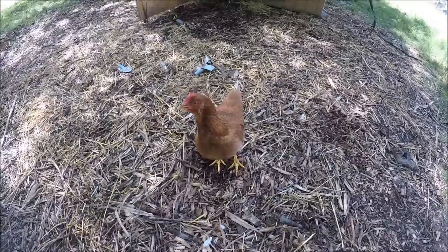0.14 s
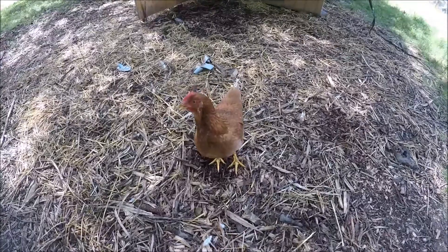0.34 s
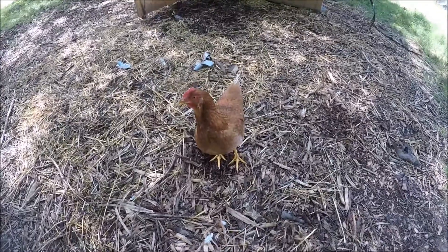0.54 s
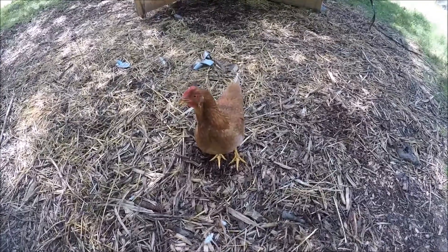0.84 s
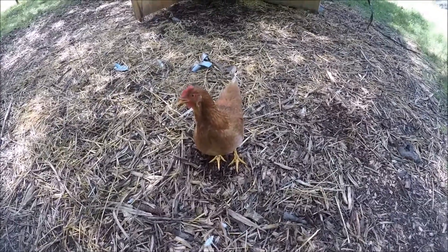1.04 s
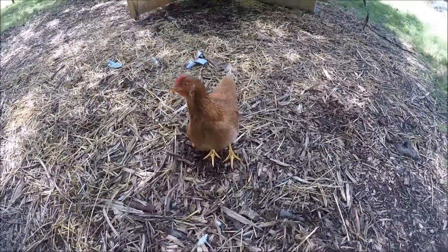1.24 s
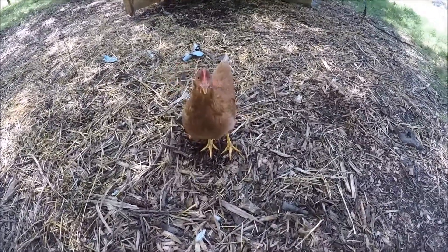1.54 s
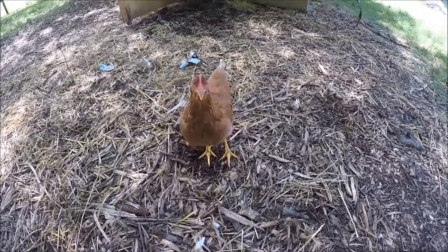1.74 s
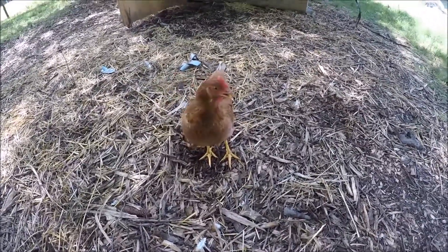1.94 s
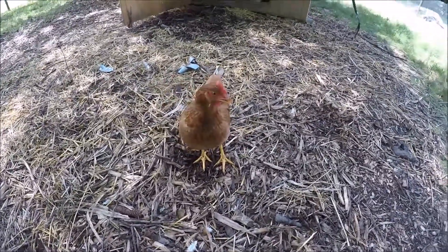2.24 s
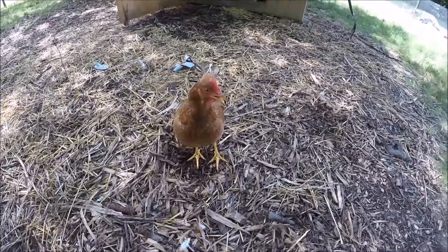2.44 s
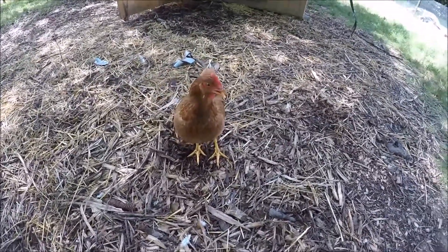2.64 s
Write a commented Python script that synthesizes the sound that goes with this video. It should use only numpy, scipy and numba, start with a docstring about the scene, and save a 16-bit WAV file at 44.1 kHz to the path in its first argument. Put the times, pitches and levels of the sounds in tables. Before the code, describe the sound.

Four held, nasal hen calls, each starting with a low catch, some rasping and cracking upward, close and nearly dry in stereo; faint outdoor hiss and low rumble, with muffled handling rubs and a single thud.

```python
"""In a straw-covered yard, a young hen close by gives four drawn-out whining calls.
Each opens with a low catch and settles on a held note; rasp and upward cracks roughen some of them.
The voice is source and filter: airy pulses of the syrinx ring the resonances of throat and beak.
Filtered noise makes the outdoor hiss and rumble. A hand rubbing the camera's case is filtered noise,
and its one knock is a sum of decaying modes."""
import sys
import numpy as np
from scipy import signal
from scipy.fft import rfft, irfft, next_fast_len
from scipy.io import wavfile
from scipy.ndimage import uniform_filter1d
from numba import njit

SR = 44100
rng = np.random.default_rng(int(sys.argv[2]) if len(sys.argv) > 2 else 0)


def bounce(signal):
    """Save signal as a 16-bit WAV file at the path given by the first command-line argument."""
    frames = np.transpose(np.atleast_2d(signal))
    limited = np.clip(frames, -1, 1)
    pcm = np.round(limited * 32767).astype(np.int16)
    wavfile.write(sys.argv[1], SR, pcm)


N = 123479
T = np.arange(N) / SR  # time [s]


def undb(db):
    """Amplitude ratio: a gain is ten to the power of its level in dB over 20."""
    return 10 ** (np.asarray(db) / 20)


def curve(rows, axis=1):
    """Linear interpolation: one column of a table is joined by straight lines in time."""
    rows = np.array(rows)
    return np.interp(T, rows[:, 0], rows[:, axis])


def over_hz(points, f):
    """Logarithmic frequency scale: values are joined by straight lines along it."""
    points = np.array(points)
    return np.interp(np.log(f + 1), np.log(points[:, 0]), points[:, 1])


def unit(x):
    """Normalization: scale to an rms value of 1."""
    return x / np.sqrt(np.mean(x ** 2))


def colour(x, points):
    """Minimum-phase filtering: folding the cepstrum makes a (Hz, dB) response causal."""
    size = 4096
    f = np.arange(size // 2 + 1) * SR / size
    cepstrum = irfft(np.log(undb(over_hz(points, f))))
    cepstrum[1:size // 2] *= 2
    cepstrum[size // 2 + 1:] = 0
    impulse_response = irfft(np.exp(rfft(cepstrum)))
    return signal.fftconvolve(x, impulse_response)[:N]


def cut(x, hz, kind):
    """Zero-phase filtering: a Butterworth low-pass or high-pass runs forward and backward."""
    sections = signal.butter(6, hz, kind, fs=SR, output="sos")
    return signal.sosfiltfilt(sections, x)


@njit
def resonance(x, hz, width):
    """Simple resonator: a two-integrator band-pass with a moving centre, where its gain is 1."""
    y, band, low = np.empty(len(x)), 0., 0.
    for i in range(len(x)):
        g = np.tan(np.pi * hz[i] / SR)
        damping = width / hz[i]
        v = (band + g * (x[i] - low)) / (1 + g * (g + damping))
        band = 2 * v - band
        low = low + 2 * g * v
        y[i] = damping * v
    return y


def fixed_resonance(x, hz, width):
    """Simple resonator whose centre frequency stays constant."""
    return resonance(x, np.full(N, float(hz)), float(width))


def wide_noise(points, likeness):
    """Interchannel correlation: a shared part and an opposed part set how alike the sides are."""
    mid, side = (unit(colour(rng.standard_normal(N), points)) for _ in range(2))
    c = np.clip(likeness, -.9, .95)
    return mid + np.sqrt((1 - c) / (1 + c)) * side * np.array([[1], [-1]])


# spectrum of the outdoor air: (frequency [Hz], relative density [dB])
AIR_SPECTRUM = [(350, -38.5), (600, -7.5), (1160, -2), (1680, -3.5), (2700, -9.5), (6100, -6.5),
                (14000, -30)]
# level of the part of the hiss shared by both sides: (time [s], level [dB])
HISS_LEVEL = [(0, -52), (.35, -47.5), (.6, -52.5), (1.25, -53), (1.7, -49), (2.8, -51.5)]
# spectrum of the low rumble: (frequency [Hz], relative density [dB])
RUMBLE_SPECTRUM = [(30, -23), (112, -27), (150, 3), (280, -1.5), (400, -7), (700, -12), (1200, -59)]
RUMBLE_DB = -50  # of the part shared by both sides


def outdoors():
    """Random noise: a soft wide hiss lies over a low rumble, each with a continuous spectrum."""
    hiss = wide_noise(AIR_SPECTRUM, likeness=.1) * undb(curve(HISS_LEVEL))
    rumble = wide_noise(RUMBLE_SPECTRUM, likeness=.45) * undb(RUMBLE_DB)
    return hiss + rumble


# upward cracks of the voice: (time [s], strength [0-1])
VOICE_BREAKS = [(.128, .6), (.165, 1), (.752, .8), (.771, .85), (.796, .5), (.857, .9), (.871, .8),
                (.886, .9), (.905, .95), (.939, .9), (.949, .9), (.963, .7), (1.003, .85), (2.246, .5),
                (2.29, .45), (2.36, .95), (2.406, 1), (2.444, 1), (2.456, .8), (2.468, .9), (2.65, .85)]
BREAK_S = .0105  # from the peak to 1/e


def breaking():
    """Register break: how far the voice is broken, as the tallest of overlapping Gaussian bumps."""
    bumps = [strength * np.exp(-((T - at) / BREAK_S) ** 2) for at, strength in VOICE_BREAKS]
    return np.max(bumps, axis=0)


FLUTTER_PER_S = 55


def waver():
    """Random modulation: normal chance values joined by lines vary quickly yet continuously."""
    knots = rng.standard_normal(int(N / SR * FLUTTER_PER_S) + 2)
    return np.interp(T * FLUTTER_PER_S, np.arange(len(knots)), knots)


WOBBLE, RASP_WOBBLE = .003, .07  # pitch waver as a share: always, and added by full rasp
JITTER, SLIP, SHIMMER_DB = .075, .1, 2.5  # scatter of timing [cycles], its drift [cycles], and size
ALTERNATE_LAG, ALTERNATE_DB = .078, 5  # every second pulse late [cycles] and weak, the others opposite
# the two sides of the syrinx beat: rate and its scatter [beats per cycle], lag [cycles], depth
BEAT_PER_CYCLE, BEAT_DRIFT, BEAT_LAG, BEAT_DB = .26, .11, .16, 5
SOFT_AIR_DB = 6.5  # extra air in the softest call
# spectrum of the air in each puff: (frequency [Hz], gain [dB])
PUFF_AIR_SPECTRUM = [(300, -31), (700, -25), (1350, -12), (3600, -11), (9000, -20)]


def syrinx(hz, rasp, alternation, soft):
    """Pulsed source: one sharp, airy puff a cycle; rasp scatters the puffs, alternation pairs them."""
    cycles = np.cumsum(hz * (1 + (WOBBLE + RASP_WOBBLE * rasp) * waver())) / SR
    alternation = alternation * (1 + .5 * waver())  # the pairing comes and goes
    k = np.arange(int(cycles[-1]))
    chance = rng.standard_normal((N // 64, 4))[:len(k)].T
    rough, paired = (np.interp(k, cycles, np.clip(v, 0, 1)) for v in (rasp, alternation))
    paired = paired * (-1.) ** k
    beat = rough * np.sin(2 * np.pi * np.cumsum(BEAT_PER_CYCLE + BEAT_DRIFT * chance[3]))

    late = JITTER * rough * chance[0] + SLIP * np.cumsum(rough * chance[1])
    late = late + ALTERNATE_LAG * paired + BEAT_LAG * beat
    at = np.interp(k + late, cycles, np.arange(N))
    size = undb(SHIMMER_DB * rough * chance[2] - ALTERNATE_DB * paired + BEAT_DB * beat)

    # a windowed sinc places each pulse between samples
    taps = at.astype(int)[:, None] + np.arange(-7, 9)
    off = taps - at[:, None]
    shape = np.sinc(off) * np.cos(np.pi * off / 16) ** 2
    puffs = np.bincount(np.clip(taps, 0, N - 1).ravel(), (size[:, None] * shape).ravel(), N)

    # the air dies away within each cycle
    since = np.interp(np.arange(N), np.sort(at), k) % 1
    air = unit(rng.standard_normal(N) * np.exp(-since / .2))
    return unit(puffs) + colour(air, PUFF_AIR_SPECTRUM) * undb(SOFT_AIR_DB * soft)


SMEAR_HZ, SMEAR_WIDTH_HZ = (900, 1350), 380


def smear(x):
    """Group delay: all-pass sections hold the middle back, so each puff spreads over its cycle."""
    for hz in SMEAR_HZ:
        x = x - 2 * fixed_resonance(x, hz, SMEAR_WIDTH_HZ)
    return x


FLUTTER_BAND_HZ, FLUTTER_DB = 400, 3.2  # spacing of the bands, and depth for a waver of 1


def flicker(x):
    """Amplitude modulation: bands around the upper partials swell and fade each by itself."""
    for hz in FLUTTER_BAND_HZ * np.arange(3, 12):
        gain = undb(FLUTTER_DB * waver())
        x = x + (gain - 1) * fixed_resonance(x, hz, FLUTTER_BAND_HZ / 2)
    return x


REGISTER_HZ = (815, 2330)  # edges between body, middle and treble
# response of throat and beak: (frequency [Hz], gain [dB])
TRACT_RESPONSE = [(110, -46.5), (175, -1), (260, -12.5), (370, -0.5), (600, -11.5), (750, 5), (880, 1.5),
                  (1100, 0), (1280, 1), (1420, -4), (1630, -8), (2000, -13), (2300, -20), (2800, -21.5),
                  (4600, -28), (5300, -45), (6400, -36), (7500, -40), (14000, -70)]
# moving resonance of the throat: (time [s], frequency [Hz])
THROAT_RESONANCE = [(0, 1270), (1.05, 1307), (1.42, 1320), (1.92, 1355), (2.3, 1166), (2.65, 1240)]
THROAT_WIDTH_HZ, THROAT_DB = 160, 0
HOLLOW_HZ, HOLLOW_WIDTH_HZ, HOLLOW_DB = 2500, 1300, -7  # dip in the softest call
# moving resonance of the beak: (time [s], frequency [Hz])
BEAK_RESONANCE = [(0, 3610), (.7, 3680), (1.1, 3530), (1.4, 3826), (1.8, 3805), (1.94, 3570), (2.2, 3600),
                  (2.65, 3666)]
BEAK_WIDTH_HZ, BEAK_DB = 210, 16
OVERTONE_HZ, OVERTONE_WIDTH_HZ, OVERTONE_DB = 6330, 260, 6.5  # the beak's upper resonance


def tract(puffs, soft):
    """Source-filter principle: throat and beak add their resonances to the pulses."""
    voice = flicker(smear(colour(puffs, TRACT_RESPONSE)))
    voice = voice + undb(THROAT_DB) * resonance(voice, curve(THROAT_RESONANCE), float(THROAT_WIDTH_HZ))
    hollow = undb(HOLLOW_DB * soft) - 1
    voice = voice + hollow * fixed_resonance(voice, HOLLOW_HZ, HOLLOW_WIDTH_HZ)
    treble = cut(voice, REGISTER_HZ[1], "high")
    beak = undb(BEAK_DB) * resonance(treble, curve(BEAK_RESONANCE), float(BEAK_WIDTH_HZ))
    overtone = undb(OVERTONE_DB) * fixed_resonance(treble, OVERTONE_HZ, OVERTONE_WIDTH_HZ)
    return voice + beak + overtone


BREAK_RISE, BREAK_RASP = .28, .42  # share by which the pitch leaps, and rasp added, in a full break
BREAK_DB = (-5, 2, 0)  # change of body, middle and treble in a full break
ECHO_S, ECHO_DB = .0035, -25  # one near reflection
ATTACK_S, RELEASE_S = .0098, .004


def call(pitch, levels, rasp, soft, broken):
    """Spectral balance: body, middle and treble each follow their own level as the bird presses."""
    hz = curve(pitch) * (1 + BREAK_RISE * broken ** 2)
    puffs = syrinx(hz, curve(rasp) + BREAK_RASP * broken, curve(rasp, axis=2), soft)
    voice = tract(puffs, soft)
    voice = voice + undb(ECHO_DB) * np.interp(T - ECHO_S, T, voice)

    body, lower = (cut(voice, edge, "low") for edge in REGISTER_HZ)
    out = 0
    for k, band in enumerate((body, lower - body, voice - lower)):
        # even out the band's own power before giving it its level
        power = uniform_filter1d(uniform_filter1d(band ** 2, size=500), size=500)
        even = band / np.sqrt(np.abs(power) + 1e-12)
        out = out + even * undb(curve(levels, axis=k + 1) + BREAK_DB[k] * broken)
    rise = np.clip(.5 + (T - levels[0][0]) / ATTACK_S, 0, 1)
    fall = np.clip(1.5 - (T - levels[-1][0]) / RELEASE_S, 0, 1)
    return out * rise * fall


# pitch of each call before waver and breaks: (time [s], frequency [Hz])
CALL_PITCH = [
    [(.025, 317.6), (.047, 299.4), (.062, 374.2), (.1, 371), (.137, 358.3), (.2, 360), (.259, 364),
     (.3, 340.4)],
    [(.59, 308.7), (.612, 311.2), (.635, 357.6), (.662, 375.6), (.7, 385), (.8, 371.4), (.93, 379.7),
     (.98, 356.4), (1.04, 390.8), (1.11, 353.3)],
    [(1.395, 337), (1.412, 332.4), (1.433, 362.8), (1.5, 366), (1.573, 380.9), (1.7, 390.5), (1.771, 399.2),
     (1.86, 399), (1.913, 416.8), (1.96, 385.5)],
    [(2.205, 323.8), (2.23, 330.8), (2.29, 360.7), (2.385, 374), (2.42, 400.7), (2.491, 393.5),
     (2.551, 383), (2.635, 396), (2.69, 377)],
]
# level of each call before breaks: (time [s], body [dB], middle [dB], treble [dB])
CALL_LEVELS = [
    [(0.025, -27, -23.5, -51), (0.043, -36, -26, -39.5), (0.059, -28, -36, -58), (0.071, -25.5, -38, -48),
     (0.093, -26.5, -40, -52), (0.137, -26, -30.5, -44.5), (0.211, -25.5, -30, -40.5),
     (0.283, -26, -31, -44), (0.297, -35, -36.5, -48)],
    [(0.59, -25.5, -26, -39), (0.604, -36, -23.5, -41), (0.618, -33.5, -33, -63), (0.65, -27, -36, -43.5),
     (0.732, -24, -36.5, -43.5), (0.748, -25, -29.5, -42), (0.95, -23.5, -27.5, -35.5),
     (1.078, -25, -23.5, -34), (1.108, -30, -37.5, -49)],
    [(1.397, -25.5, -30, -53), (1.411, -31.5, -25.5, -35.5), (1.431, -28.5, -35.5, -52.5),
     (1.503, -27, -35, -38.5), (1.594, -24, -31.5, -35), (1.712, -23.5, -32, -31.5), (1.775, -22, -23, -32),
     (1.845, -23, -26, -27.5), (1.895, -25, -17.5, -28.5), (1.934, -23.5, -19.5, -24.5),
     (1.957, -29, -27.5, -37.5)],
    [(2.204, -19, -14.5, -55), (2.21, -31, -21, -31), (2.262, -26, -26, -37), (2.428, -21, -21.5, -28),
     (2.452, -24, -21.5, -33.5), (2.488, -22, -23.5, -32), (2.632, -21.5, -20, -31),
     (2.67, -23, -21.5, -30), (2.686, -27.5, -30, -44)],
]
# unevenness of the syrinx before breaks: (time [s], rasp [0-1], strong-weak alternation [0-1])
CALL_RASP = [
    [(.025, .05, 0), (.115, .06, .02), (.145, .3, .2), (.18, .05, .03), (.21, .07, .1), (.25, .04, .02)],
    [(.6, .04, 0), (.62, .2, 0), (.655, .04, .03), (.735, .04, .03), (.755, .35, .3), (.82, .1, .27),
     (.89, .45, .3), (1.03, .17, .3), (1.1, .05, .12)],
    [(1.4, .08, 0), (1.44, .02, .08), (1.56, .02, .03), (1.595, .02, .25), (1.62, .02, .02),
     (1.645, .02, .18), (1.67, .02, .02), (1.72, .02, .03), (1.74, .05, .25), (1.82, .04, .06),
     (1.9, .05, .33), (1.95, .05, .2)],
    [(2.225, .05, 0), (2.25, .17, .28), (2.335, .13, .4), (2.465, .15, .4), (2.485, .015, .02),
     (2.63, .015, .08), (2.67, .14, .35)],
]
# softness of each call [0-1]: a soft call is airier, and hollow below the beak's resonance
CALL_SOFTNESS = (1, 1, .2, 0)
# the hen at the two microphones: (frequency [Hz], left minus right [dB])
HEN_LEVEL_DIFFERENCE = [(200, -1), (520, -3), (640, 0), (760, -2), (1000, 1.5), (1250, 3.5), (1450, 2),
                        (1900, 5), (2900, 0), (9000, -2)]
# the same for phase: (frequency [Hz], lead of the left [rad])
HEN_PHASE_LEAD = [(450, -.05), (600, .4), (950, .75), (1300, .45), (1700, .7), (2600, -.1), (6400, .7)]
YARD_DB, YARD_T60_S = -17, .08


def hen():
    """Interchannel differences and reverberation: four calls lean to a side and scatter in the yard."""
    broken = breaking()
    calls = zip(CALL_PITCH, CALL_LEVELS, CALL_RASP, CALL_SOFTNESS)
    voice = sum(call(*settings, broken) for settings in calls)

    size = next_fast_len(N + 2048)
    f = np.arange(size // 2 + 1) * SR / size
    # each side takes half of the difference
    lean = undb(over_hz(HEN_LEVEL_DIFFERENCE, f) / 2) * np.exp(.5j * over_hz(HEN_PHASE_LEAD, f))
    spectrum = rfft(voice, size)
    direct = np.array([irfft(spectrum * gain, size)[:N] for gain in (lean, 1 / lean)])

    # decaying noise, starting 2 ms after the direct sound
    tail = rng.standard_normal((2, N)) * 1000 ** (-T / YARD_T60_S) * (T > .002)
    scatter = np.array([signal.fftconvolve(voice, h / np.linalg.norm(h))[:N] for h in tail])
    return direct + undb(YARD_DB) * scatter


# modes of the camera's case: (frequency [Hz], relative level [dB], 60 dB decay time [s])
CASE_MODES = [(190, -3, .014), (480, 0, .017), (1300, -22, .015)]
KNOCK_S, KNOCK_RISE_S, KNOCK_DB = 1.9652, .0015, -1
# spectrum of the rubbing hand: (frequency [Hz], relative density [dB])
RUB_SPECTRUM = [(40, -26), (100, -37.5), (150, -10), (280, 1.5), (1400, -18.5), (5000, -60)]
# level of the rubbing on the left: (time [s], level [dB])
RUB_LEVEL = [(.8, -58), (1.06, -33), (1.15, -43.5), (1.22, -33), (1.32, -43), (1.6, -37), (1.955, -57),
             (1.975, -28), (2.12, -35), (2.2, -37.5), (2.27, -57)]
CASE_RIGHT = -.61  # the case drives the right microphone in opposite phase


def handling():
    """Structure-borne sound: a rubbing hand and one dull knock travel through the camera's case."""
    age = np.maximum(T - KNOCK_S, 0)
    ring = sum(undb(db - 60 * age / t60) * np.sin(2 * np.pi * hz * age) for hz, db, t60 in CASE_MODES)
    knock = cut(ring * np.minimum(age / KNOCK_RISE_S, 1), 116, "high") * undb(KNOCK_DB)
    rub = unit(colour(rng.standard_normal(N), RUB_SPECTRUM)) * undb(curve(RUB_LEVEL))
    return (knock + rub) * np.array([[1], [CASE_RIGHT]])


def scene():
    """Superposition: yard, hen and the hand on the case add as pressures."""
    return outdoors() + hen() + handling()


TOP_HZ = 14000


def record(dry):
    """Band limitation: a steep elliptic low-pass in the camera cuts the top."""
    sections = signal.ellip(8, .2, 70, TOP_HZ, fs=SR, output="sos")
    return signal.sosfilt(sections, dry)


dry = scene()
out = record(dry)
bounce(out)
```